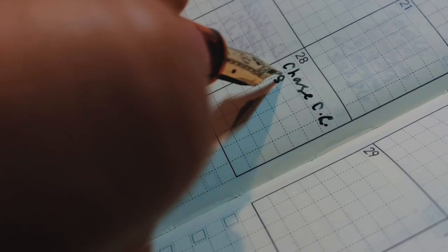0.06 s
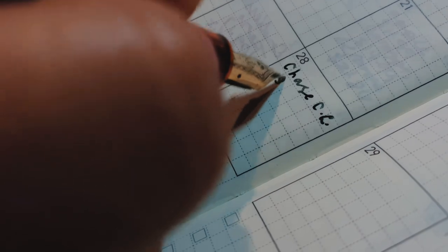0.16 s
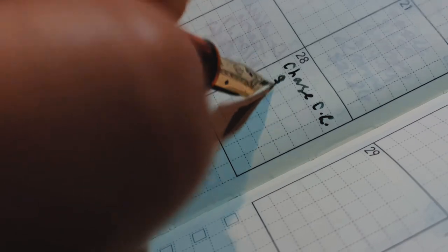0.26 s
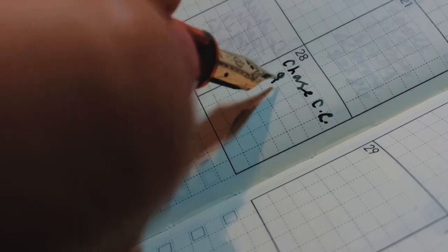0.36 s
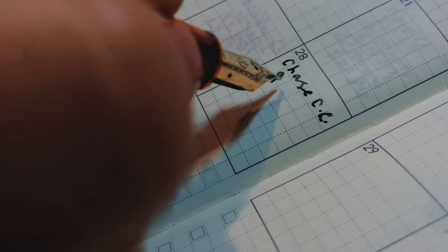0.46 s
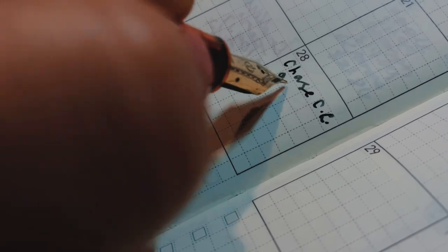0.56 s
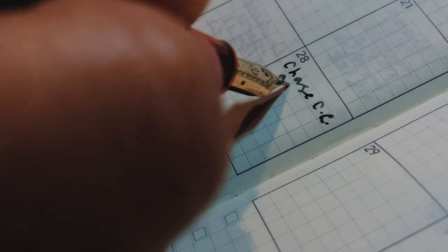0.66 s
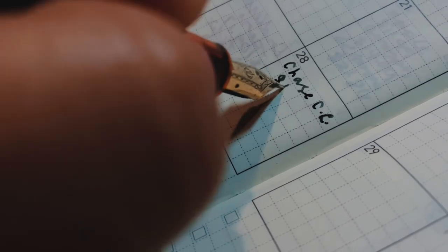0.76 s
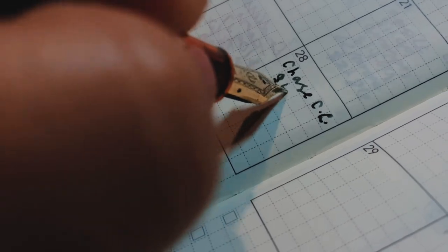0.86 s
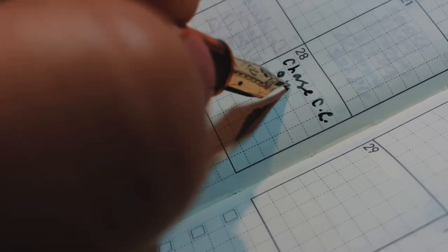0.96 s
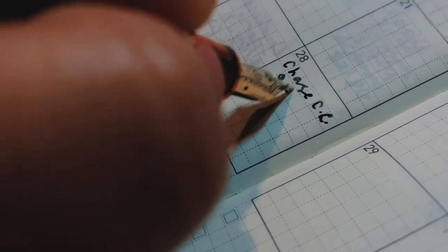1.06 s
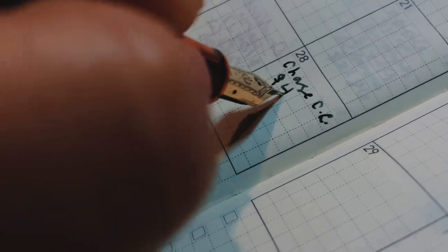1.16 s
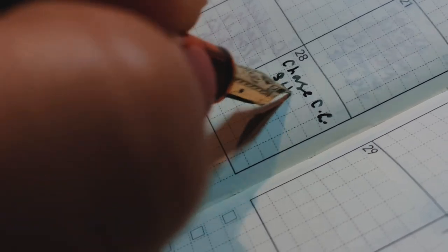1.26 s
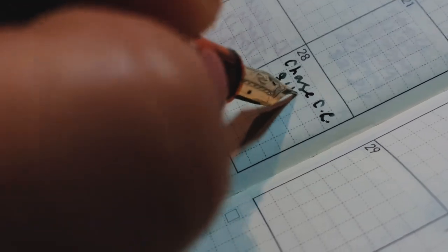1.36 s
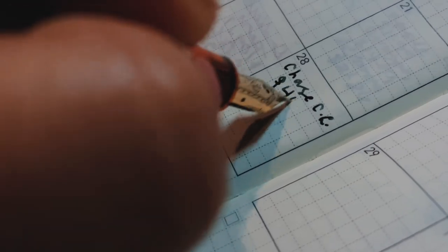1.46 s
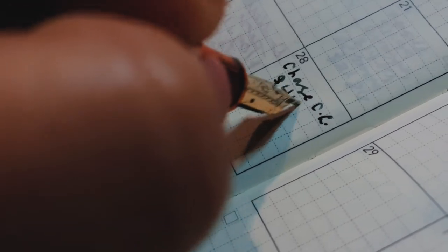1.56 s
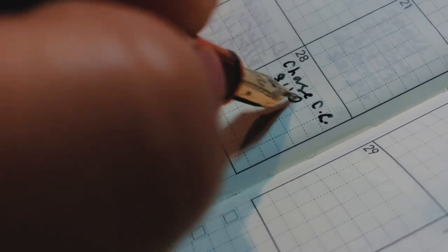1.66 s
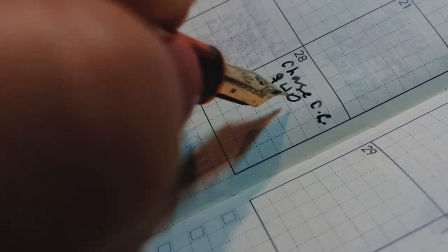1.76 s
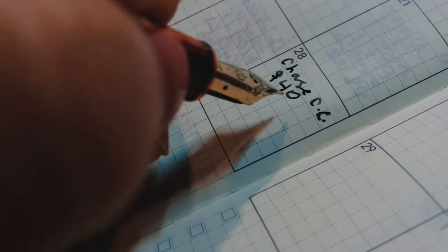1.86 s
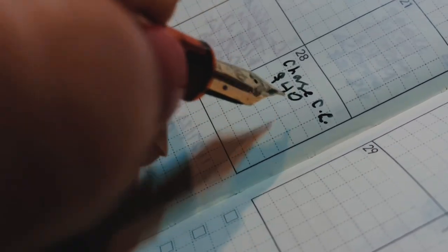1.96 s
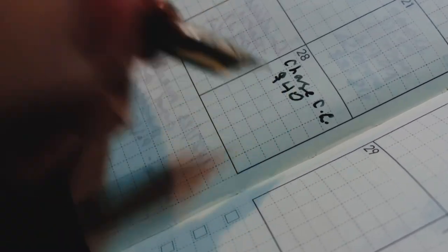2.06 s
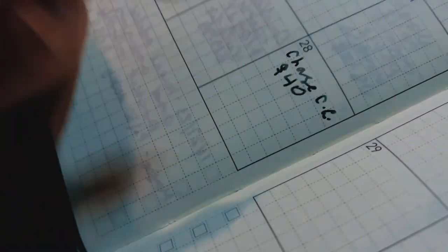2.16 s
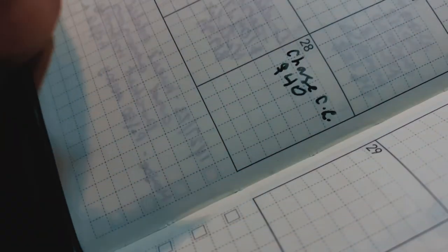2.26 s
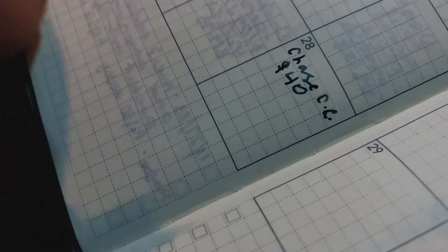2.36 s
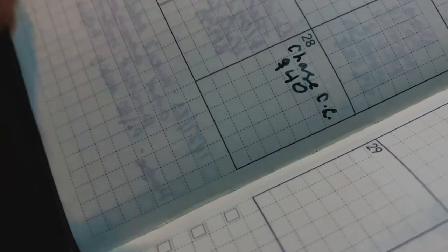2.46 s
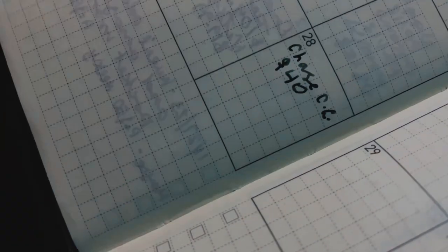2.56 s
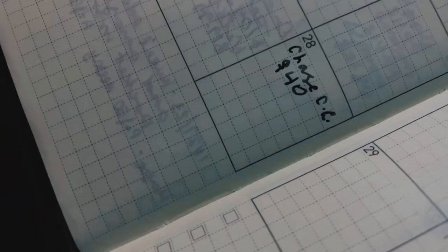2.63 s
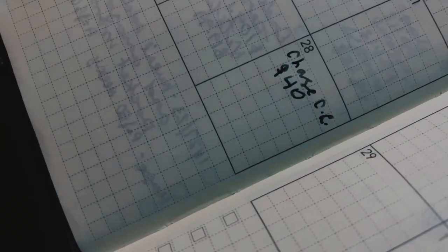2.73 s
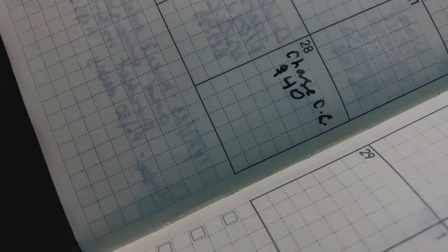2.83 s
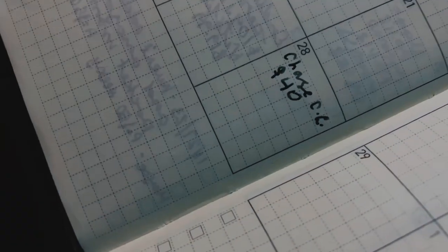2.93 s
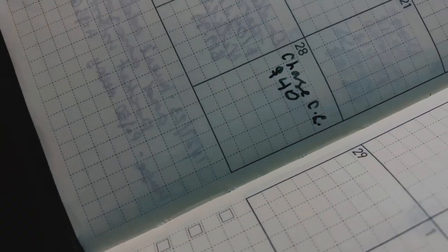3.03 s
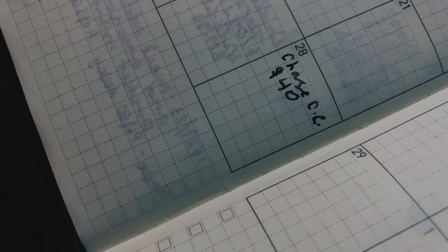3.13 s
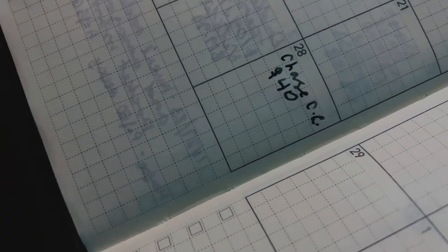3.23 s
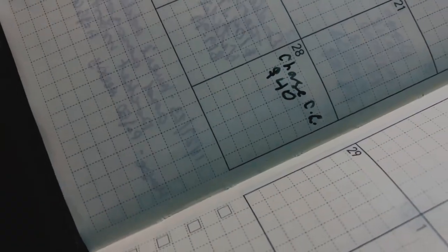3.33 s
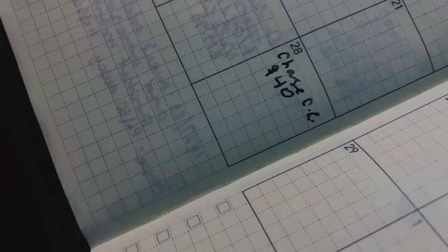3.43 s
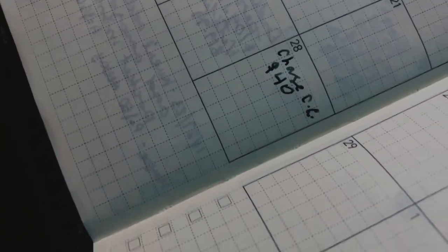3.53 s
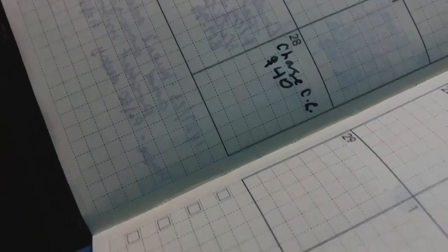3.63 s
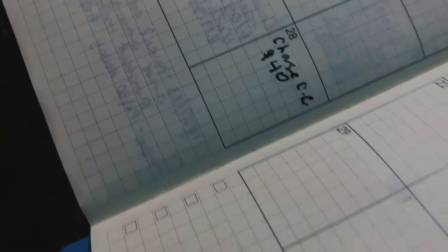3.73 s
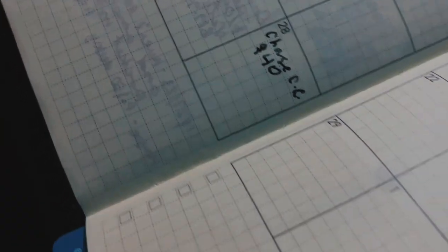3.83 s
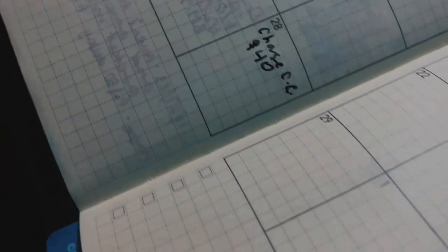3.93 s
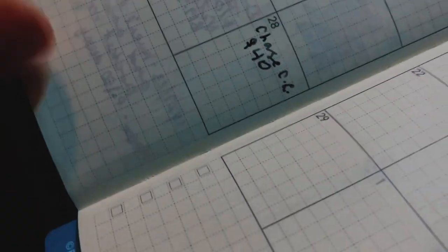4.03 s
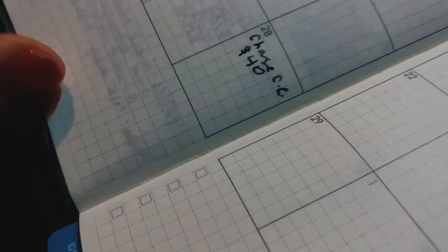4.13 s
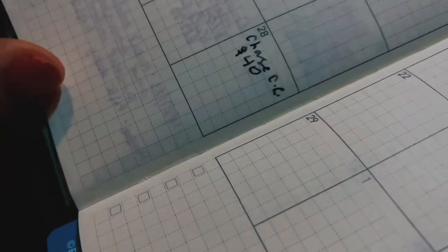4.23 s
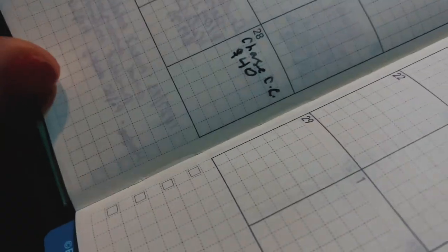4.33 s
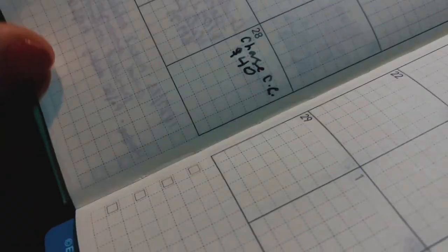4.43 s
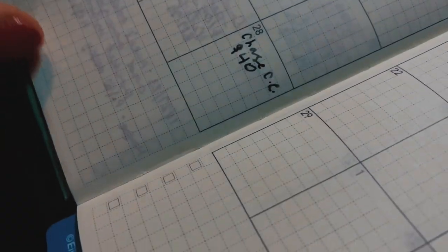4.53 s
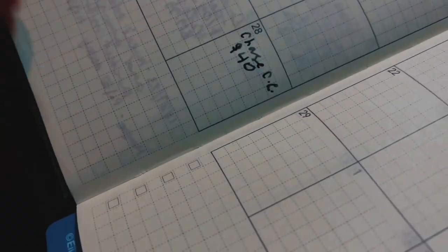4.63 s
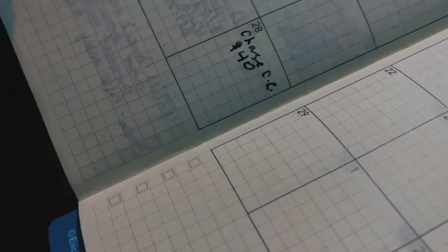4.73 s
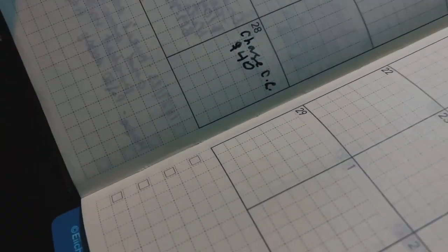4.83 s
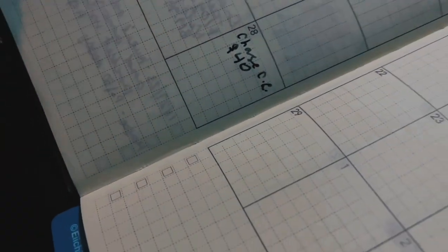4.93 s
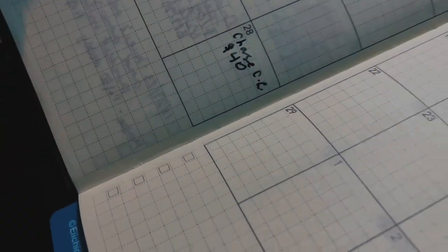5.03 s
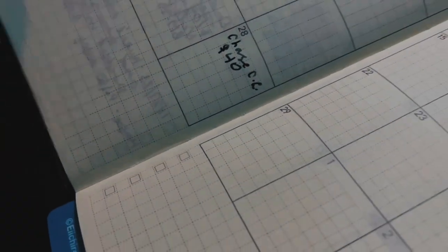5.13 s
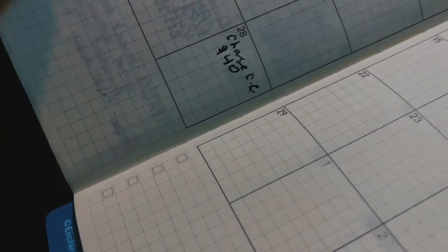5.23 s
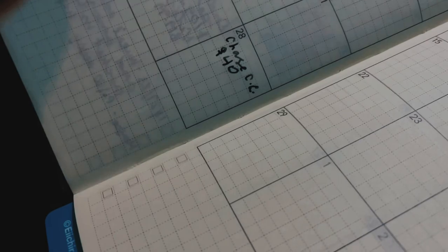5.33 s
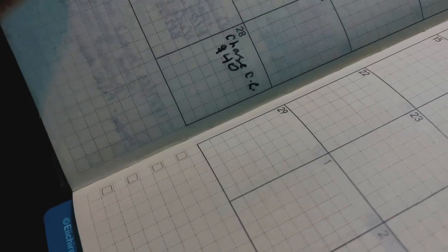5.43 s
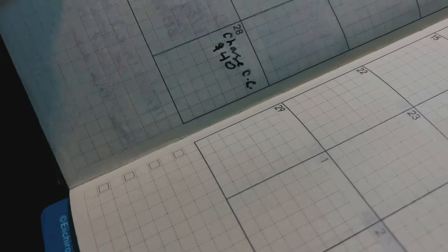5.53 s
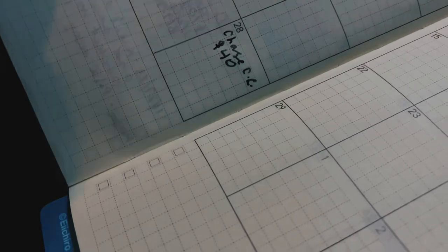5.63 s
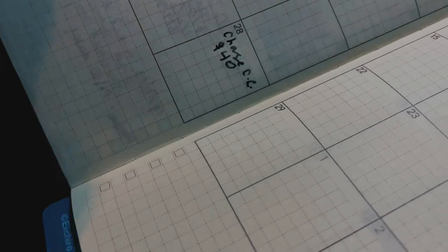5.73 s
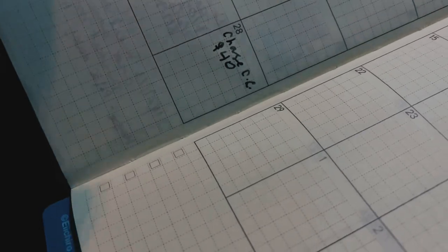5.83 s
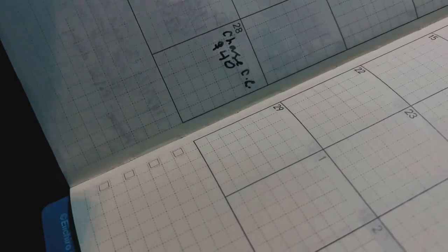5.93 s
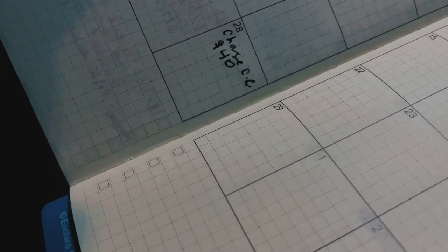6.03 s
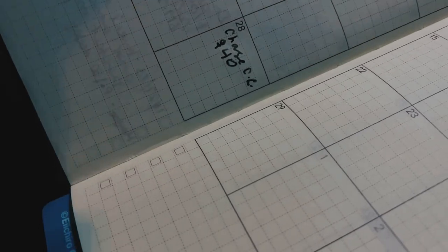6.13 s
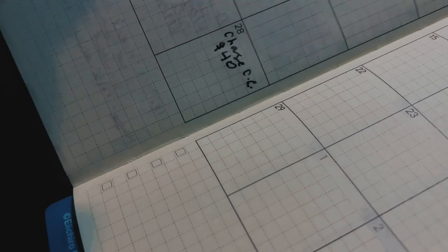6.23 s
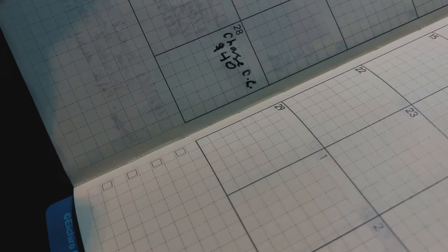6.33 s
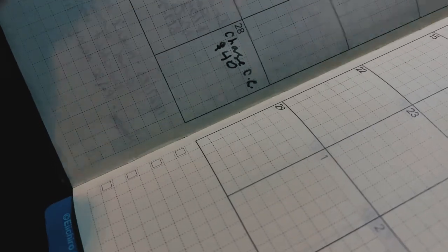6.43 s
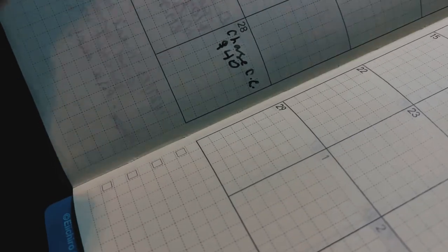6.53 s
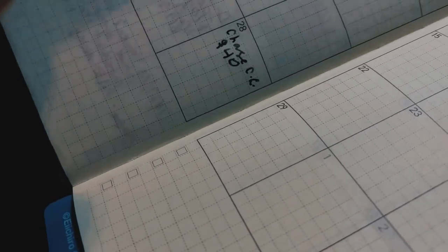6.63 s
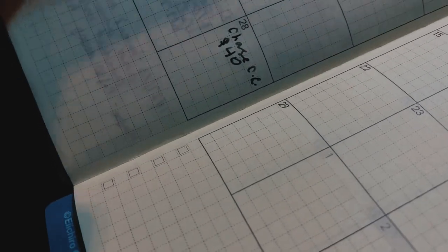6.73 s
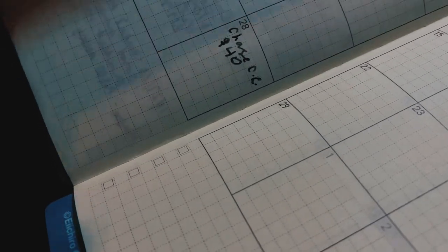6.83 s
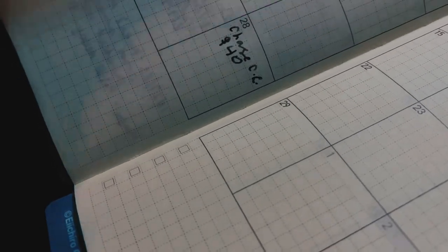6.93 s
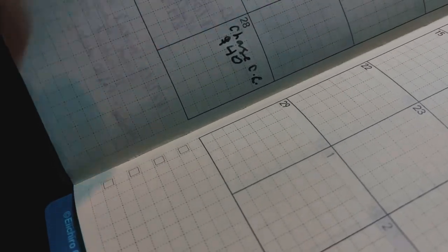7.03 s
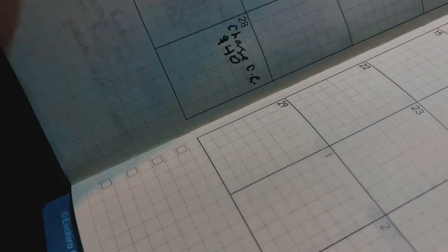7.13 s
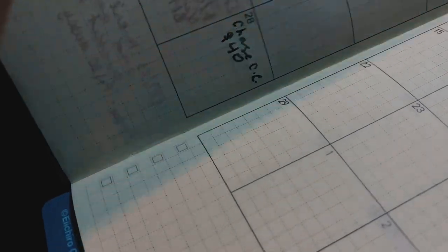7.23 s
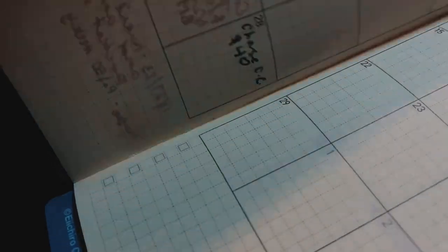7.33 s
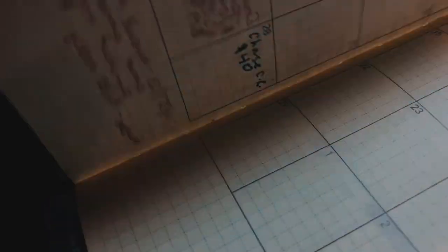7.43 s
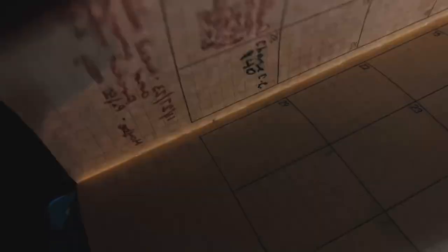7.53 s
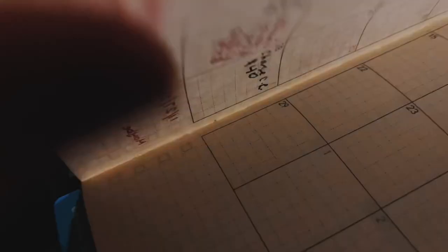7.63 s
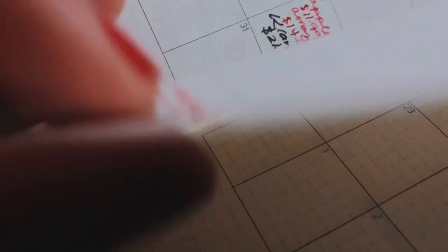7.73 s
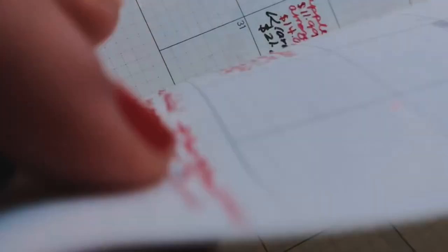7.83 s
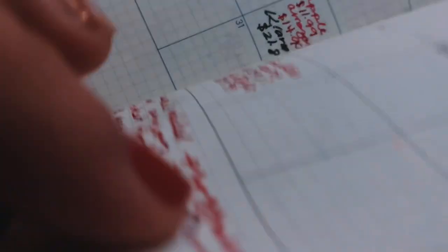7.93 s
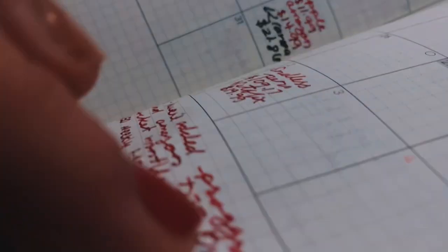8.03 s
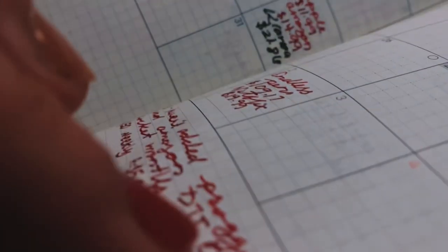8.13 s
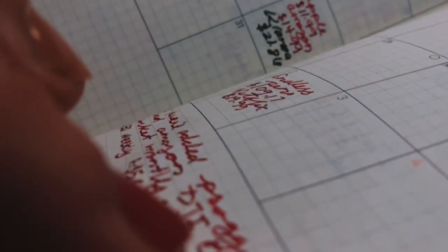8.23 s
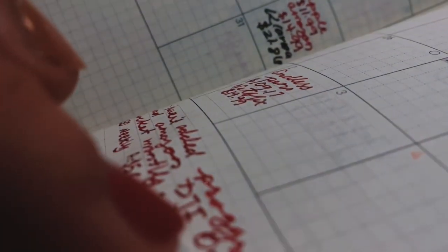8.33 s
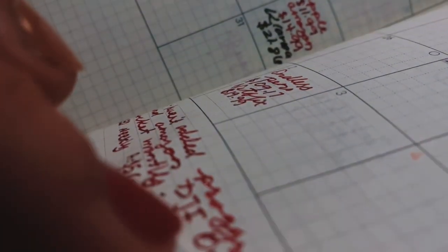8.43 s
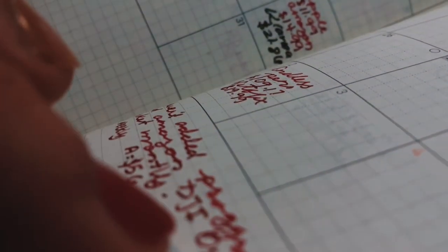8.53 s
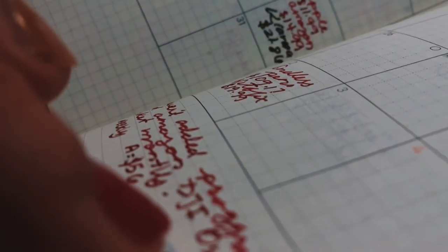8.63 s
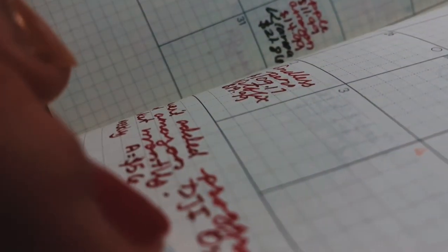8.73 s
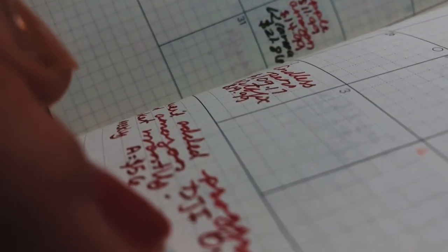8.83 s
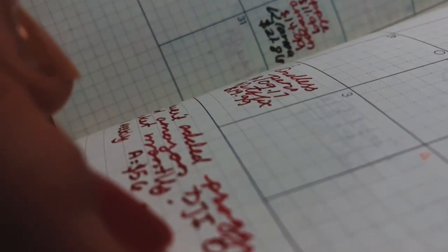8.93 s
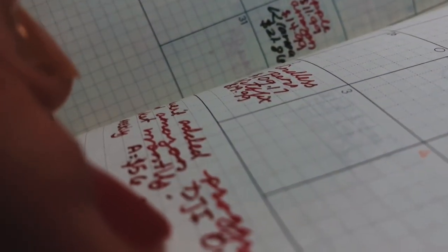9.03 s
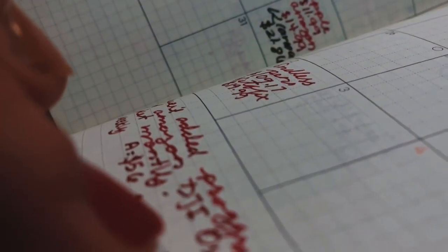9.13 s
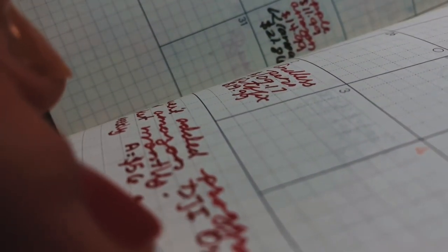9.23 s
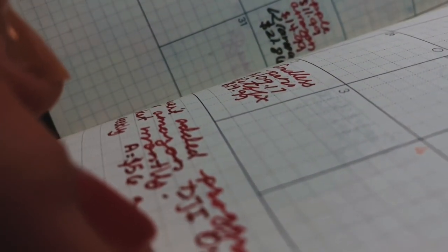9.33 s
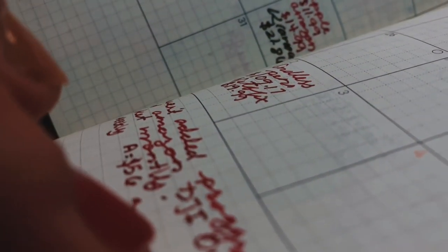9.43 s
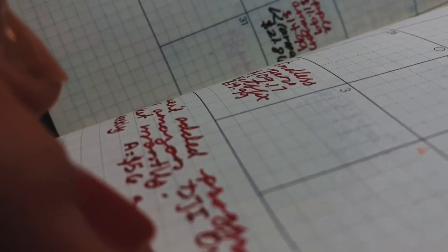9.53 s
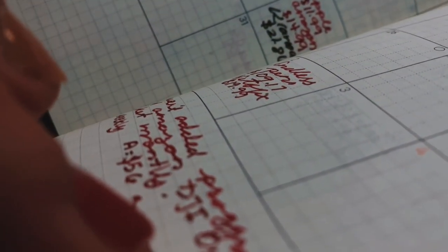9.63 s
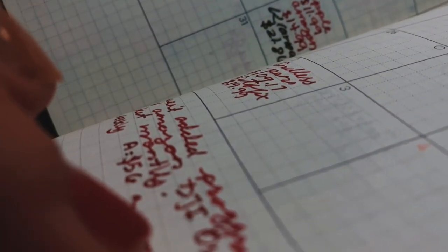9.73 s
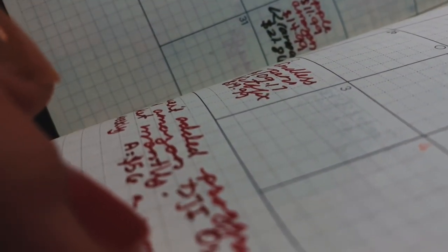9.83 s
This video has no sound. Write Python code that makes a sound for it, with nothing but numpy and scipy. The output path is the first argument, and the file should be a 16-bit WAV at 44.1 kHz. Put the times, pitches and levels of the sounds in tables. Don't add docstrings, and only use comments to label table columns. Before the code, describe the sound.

Faint nib scrapes come first, irregular and brief, over a soft drone of building hum and distant tyres. Skin brushes across paper, then isolated snaps and light finger rubbing. Page handling grows busier: hissing sheets, crisp flicks, pops and low soft thumps, until a page cracks flat with a hard bright slap. Only tiny dry paper creaks follow. Close microphone on a desk, with barely any room echo.

```python
import sys
import numpy as np
from scipy import signal
from scipy.fft import rfft, irfft, next_fast_len
from scipy.io import wavfile
from scipy.ndimage import uniform_filter1d, map_coordinates

SR = 44100
rng = np.random.default_rng(int(sys.argv[2]) if len(sys.argv) > 2 else 0)


def master_out(mix):
    frames = np.transpose(np.atleast_2d(mix))
    ceiling = np.clip(frames, -1, 1)
    pcm = np.round(ceiling * 32767).astype(np.int16)
    wavfile.write(sys.argv[1], SR, pcm)


def gain_from_db(level_db):
    decades = np.asarray(level_db, float) / 20
    return 10 ** decades


N = 436129

# start [t/s], end [t/s], start [level/dB], end [level/dB], hiss over body [dB]
PAGE_DRAGS = [(3.47, 3.6, -77.5, -74.5, 4.5), (4.016, 4.123, -61, -60.5, -5.5),
              (4.232, 4.249, -55.5, -61, -3.5), (6.54, 6.557, -40, -37, 6), (4.502, 4.59, -61, -56, 3.5),
              (4.584, 4.638, -58.5, -52.5, 5), (4.637, 4.777, -53, -61, 4), (5.005, 5.035, -64, -66, 2),
              (5.035, 5.124, -47.5, -48, 2), (5.802, 5.919, -74, -72, 0), (6.088, 6.198, -70, -63, -6),
              (6.35, 6.37, -63, -63, -10), (6.458, 6.47, -63, -63, -7), (5.124, 5.153, -48, -51, -10.5),
              (5.149, 5.285, -62.5, -57.5, -4), (5.273, 5.344, -57, -48.5, -0.5),
              (5.342, 5.375, -61, -59.5, -2.5), (5.919, 5.962, -42.5, -41.5, 3),
              (5.991, 6.089, -64, -71, -2), (6.476, 6.505, -55, -48.5, 0), (6.797, 6.848, -47.5, -39, 0),
              (6.849, 6.886, -38, -42, -2), (6.886, 6.933, -48, -46, -2), (6.935, 6.956, -52, -58, 10),
              (6.96, 6.999, -61.5, -55.5, 9), (7.001, 7.036, -58, -62, 12), (7.037, 7.072, -47, -57.5, 5),
              (7.16, 7.202, -49.5, -56, -3), (7.197, 7.274, -49, -55, -0.5),
              (7.272, 7.293, -49.5, -48, -1.5), (7.294, 7.323, -60, -59, -5), (7.32, 7.369, -52, -47, -7.5),
              (7.482, 7.56, -56.5, -56.5, -9), (7.561, 7.66, -56.5, -61, -3), (7.425, 7.473, -64, -62, 2),
              (7.752, 7.794, -55.5, -59.5, 1.5), (7.926, 7.987, -43.5, -46, -11),
              (8.065, 8.194, -57, -58.5, -14), (8.507, 8.594, -53, -62, -22)]
# start [t/s], peak [t/s], end [t/s], peak [level/dB], hiss over body [dB]
PAGE_FLICKS = [(4.78, 4.823, 4.87, -62, 3), (5.37, 5.42, 5.5, -48.5, 0.5), (5.5, 5.521, 5.531, -40, -3),
               (5.538, 5.548, 5.564, -34.5, -2.5), (5.564, 5.636, 5.662, -36, -4),
               (5.675, 5.713, 5.77, -49, -6), (5.958, 5.962, 5.99, -43, -4),
               (6.198, 6.238, 6.275, -42, -11), (6.28, 6.288, 6.35, -56, -13),
               (6.37, 6.414, 6.455, -52, -12), (6.505, 6.535, 6.5385, -39, 2),
               (6.546, 6.556, 6.575, -40, -16), (7.365, 7.402, 7.43, -46, 0), (7.43, 7.472, 7.478, -55, -4),
               (7.655, 7.69, 7.725, -50, -9), (7.745, 7.761, 7.78, -58, -3), (7.985, 7.992, 8.035, -45, -9),
               (8.31, 8.346, 8.362, -58, -8), (9.12, 9.151, 9.158, -55, -17)]


def rubs():
    outlines = []
    for start, end, start_db, end_db, hiss_db in PAGE_DRAGS:
        outlines.append([(start, start_db, hiss_db), (end, end_db, hiss_db)])
    for start, top, end, db, hiss_db in PAGE_FLICKS:
        outlines.append([(start, db - 11.5, hiss_db), (top, db, hiss_db), (end, db - 15.5, hiss_db - 4)])
    return outlines


# f/Hz, level/dB [dB per Hz]
SHEET_COLOUR = [(650, -39), (1100, -11), (1760, -8.5), (2300, -4.5), (3050, -3.5), (4560, -9.5), (4940, -7),
                (5710, -7.5), (6240, -8), (7140, -11), (8260, -9.5), (12400, -20.5), (15000, -15.5),
                (16000, -32)]
# t/s, peak [level/dB], hiss over body [dB]
SHEET_CRACKLES = [(5.153, -40, -10), (5.177, -51, -8), (5.2759, -51, -5.5), (5.357, -39, -12),
                  (5.598, -34, -18.5), (5.624, -33, -12), (5.775, -50.5, -10), (6.13, -38.5, -18),
                  (5.199, -52, -6), (5.461, -44, -10), (6.228, -40, -14), (6.408, -50, -14),
                  (6.284, -38.5, -28), (6.315, -38.5, -22.5), (7.201, -35.5, -14)]
# start [t/s], end [t/s], gain of the band [level/dB], centre [f/Hz], width [Hz]
CUPPED_AIR = [(4, 4.78, -10, 3750, 380), (4.6, 5.27, -10, 7000, 1370), (6.934, 6.958, 10, 5500, 1600),
              (6.96, 7.03, 9, 5100, 1380), (6.98, 7.035, 7, 7000, 2500), (7.04, 7.074, 0, 5800, 1500),
              (5.7, 6.885, -12, 2600, 950), (6.83, 6.87, -11, 5400, 1800), (6.9, 6.932, -3, 5200, 1240),
              (5.595, 5.612, -8.5, 3160, 900), (5.6, 5.65, -10, 4100, 1940), (7.17, 7.235, -5, 4700, 1500),
              (7.9, 6.8, -9, 3000, 900), (7.41, 7.478, -2, 5700, 1200), (7.19, 8.3, -13, 3200, 850),
              (7.66, 7.72, -1, 2100, 1200), (7.5, 8.2, -19.5, 14150, 2500),
              (6.475, 6.533, -3.5, 8400, 1800), (6.485, 6.533, -1, 4600, 1600),
              (5.92, 5.97, -5, 4200, 1500), (7.5, 8.5, -17, 11000, 3400), (7.93, 8, -9, 1960, 980),
              (7.93, 8.03, -6, 4430, 1500), (5.276, 5.345, -5, 6700, 1600), (5.4, 5.45, -6, 7400, 2500),
              (5.2, 5.25, -10, 9100, 1200), (5.04, 5.15, -15, 2270, 1100)]


def pages():
    rub = grit(grain_db=1.0, patchy_db=2.0)
    split_hz = 5000

    def high(hz):
        return 1 / (1 + (split_hz / (hz + 1)) ** 5)

    body = unit(filtered(rub, lambda hz: gain_from_db(along(SHEET_COLOUR, hz)) * np.sqrt(1 - high(hz))))
    hiss = unit(filtered(rub, lambda hz: gain_from_db(along(SHEET_COLOUR, hz)) * np.sqrt(high(hz))))
    outlines = rubs()
    gain = swell(outlines, edge_s=0.00304)
    gain = gain + gain_from_db(-26.0) * linger(gain, length_s=0.06)
    hiss_share = gain_from_db(curve(outlines, column=2, silent=-8.5) - 1.8)
    gains = gain_from_db(-2.0) * gain * np.array([np.ones(N), hiss_share])

    t = np.arange(SR // 16) / SR
    spurt = (1 - np.exp(-t / 0.00065)) * np.exp(-(t / 0.0098) ** 2)
    for s, db, hiss_db in SHEET_CRACKLES:
        levels = db - 13.5 + np.array([[0], [hiss_db + 8.5]])
        gains[:, round(s * SR):][:, :len(t)] += gain_from_db(levels) * spurt

    cups = np.zeros(N)
    for s, end, db, hz, width in CUPPED_AIR:
        cup_gain = swell([[(s, db), (end, db)]], edge_s=0.009)
        cups += cup_gain * unit(band(rub, hz - width / 2, hz + width / 2))
    return gains[0] * (body + cups) + gains[1] * hiss


# t/s, peak [level/dB], hiss relative [dB], knock relative [dB], note [f/Hz]
PAPER_SNAPS = [(2.0348, -33.5, -30, -5.5, 5100), (2.0406, -38.5, -30, -5, 3820),
               (2.041, -35, -30, -12, 5200), (3.98, -45, -4, -9.5, 6500), (4, -43, -1.5, -2, 8000),
               (4.016, -40, -9.5, -1.5, 3700), (4.2267, -26, -2, -10, 5210), (5.0374, -36.5, -5, -13, 3340),
               (5.6, -23, -16, -18, 3200), (5.627, -22, -11, -10, 3580), (5.9204, -27, -19, -12, 4170),
               (6.5352, -23.5, -16, -6, 5870), (6.5364, -18, -19.5, -7, 4400), (6.5423, -22, -16, -6, 6400),
               (6.5437, -13, -13.5, -20, 5360), (6.545, -17, -19.5, -10, 4570),
               (6.8012, -36.5, 0, 2.5, 4560), (6.92, -40, -9, -14.5, 5220), (6.9255, -40, -9, -12.5, 3000),
               (6.9395, -39.5, -9.5, -20.5, 7500), (6.9412, -29.5, -12, -22.5, 5440),
               (6.9515, -40, -13, -21.5, 5340), (6.9525, -40, -18.5, -17.5, 5200),
               (6.9753, -27, -6, -22, 5300), (6.9858, -45.5, 6, -20, 7000), (7.0358, -25.5, -4, -25, 6920),
               (7.0738, -24, -37.5, -6, 2920), (7.2978, -37.5, 3, -22.5, 7000),
               (7.3144, -15.5, -19, -10.5, 3300), (7.4788, -19.5, -25, -10.5, 4650),
               (7.5574, -46.5, -17, 2, 700), (7.659, -32.5, -32, -4, 2120),
               (8.459, -12.5, -23, -26.5, 11400), (8.4592, -17, -14, -20, 8000),
               (8.459, -22, -18.5, -20, 14500)]
# t/s, peak [level/dB], knock relative [dB], note [f/Hz]
NIB_TICKS = [(0.0953, -41, -6.5, 3580), (0.2784, -53.5, -20, 6500), (0.2997, -45.5, -12.5, 4000),
             (0.582, -46.5, -16.5, 3000), (0.973, -45.5, -14.5, 3500), (1.0002, -45.5, -5, 3500),
             (1.283, -50, -7.5, 3500), (1.3145, -53.5, 4, 3500), (1.374, -40, -0.5, 3600),
             (1.697, -41.5, -6, 3630), (2.0136, -46, -13, 3600), (2.0352, -38, -2, 3900),
             (2.0397, -39, -12, 3900), (2.1703, -36, 0, 4200), (2.404, -50, -8, 3600),
             (2.5387, -51, -4, 3600), (3.548, -49.5, -10.5, 6000), (4.2569, -38, -8, 3800),
             (5.756, -55.5, -5, 3600)]
# t/s, peak [level/dB], first pitch [f/Hz]
SHEET_POPS = [
    (2.1707, -44, 1500),
    (6.8871, -17.5, 1800),
    (7.0742, -29, 1310),
    (7.4814, -30, 1720),
    (7.5578, -29, 900),
    (8.4591, -7.5, 1870),
]


def snaps():
    t, parts = np.arange(SR // 12) / SR, np.zeros((4, N + SR))
    spread = np.array([[1.1], [0.6], [1.9]])
    fade = gain_from_db(-60 * t / (0.0038 * spread)) + gain_from_db(-13 - 60 * t / (0.028 * spread))
    events = [(s, db, -9, knock_db, hz, -7.5) for s, db, knock_db, hz in NIB_TICKS]
    events += [(s, db, hiss_db, knock_db, hz, -1.5) for s, db, hiss_db, knock_db, hz in PAPER_SNAPS]
    for s, db, hiss_db, knock_db, hz, note_db in events:
        start = round(s * SR)
        burst = 1.03 * rng.standard_normal(len(t)) * fade * (1 - np.exp(-t / 0.000238))
        burst[:, 6] += 4.5
        levels = db + np.array([[0], [hiss_db], [knock_db]])
        parts[:3, start:][:, :len(t)] += gain_from_db(levels) * burst
        parts[3, start:][:len(t)] += gain_from_db(db + note_db) * falling(hz, sag=13.96, cycles=20.6)
    for s, db, hz in SHEET_POPS:
        parts[3, round(s * SR):][:len(t)] += gain_from_db(db - 3.5) * falling(hz, sag=1.3, cycles=28)

    out = parts[3, :N].copy()
    bands = [(1630, 4460, 0.37), (6100, 22000, 5.7), (446, 2020, 9.7)]  # (low Hz, high Hz, dB)
    for (low, top, db), part in zip(bands, parts):
        out += gain_from_db(db) * band(part[:N], low, top)
    return out


# t/s, level/dB
PAGE_SLAP = (8.459, -4)
# f/Hz, level/dB, t60 [s]
COVER_RING = [(619, -19, 0.066), (780, -11, 0.04), (933, -10, 0.0298), (1292, -2.5, 0.0263),
              (1615, 2, 0.018), (1821, -4, 0.051), (2066, 0.5, 0.028), (2420, -1.5, 0.031),
              (2832, -5, 0.035), (3300, -6, 0.037), (3650, -3.5, 0.024), (4150, -5.5, 0.0265),
              (5210, -4, 0.025), (6000, -13, 0.026), (7370, -8, 0.024)]


def slap():
    t, out = np.arange(SR // 8) / SR, np.zeros(N)
    ring = np.zeros(len(t))
    for k, (hz, db, t60) in enumerate(COVER_RING):
        blur = uniform_filter1d(rng.standard_normal(len(t)), 30) * 5
        mode = (0.56 + 0.648 * blur) * np.sin(2 * np.pi * hz * t)
        ring += (-1) ** k * gain_from_db(db - 60 * t / (0.74 * t60)) * mode
    crack = rng.standard_normal(len(t)) * (gain_from_db(-5.5 - 60 * t / 0.008) + gain_from_db(-26 - 60 * t / 0.025))
    crack += uniform_filter1d(rng.standard_normal(len(t)), 22) * gain_from_db(-3.5 - 60 * t / 0.052)
    s, db = PAGE_SLAP
    out[round(s * SR):][:len(t)] = gain_from_db(db) * (gain_from_db(-7) * ring * (1 - np.exp(-t / 0.00062)) + crack)
    return out


# t/s, peak [level/dB]
PAGE_CREAKS = [(7.818, -38), (7.854, -35), (7.909, -33), (8.066, -33.5), (8.268, -41.5), (8.302, -38),
               (8.3333, -45.5), (8.4305, -32.5), (8.487, -48.5), (8.618, -48), (8.645, -45), (8.688, -45.5),
               (8.7829, -49), (8.816, -39.5), (8.843, -44.5), (9.021, -44), (9.117, -42.5), (9.212, -52),
               (9.2503, -38.5), (9.28, -42), (9.56, -44), (9.6028, -44.5), (9.663, -41.5), (9.707, -42.5),
               (9.736, -44), (9.787, -39)]
# f/Hz, level/dB [dB per Hz]
HELD_PAGE = [(820, -32), (1400, -5.5), (2890, 1), (4170, -8.5), (4900, -7.5), (6390, -14), (10300, -18.5),
             (11800, -21), (14700, -20), (16000, -17)]


def creaks():
    t, gain = np.arange(SR // 16) / SR, np.zeros(N)
    spurt = (1 - np.exp(-t / 0.00083)) * (np.exp(-(t / 0.0085) ** 2) + 0.15 * np.exp(-t / 0.0185))
    for s, db in PAGE_CREAKS:
        gain[round(s * SR):][:len(t)] += gain_from_db(db - 10.5) * spurt
    return gain * coloured(rng.standard_normal(N) * gain_from_db(1.8 * wobble(500)), HELD_PAGE)


# t/s, level/dB, pitch [f/Hz]
DESK_THUDS = [(2.133, -37, 70.4), (2.175, -34, 80), (4.02, -32, 83.5), (5.023, -32.5, 169),
              (5.03, -40, 105), (5.035, -33, 74.5), (5.525, -32, 95.5), (5.559, -33, 121),
              (6.547, -20.5, 203), (6.556, -19, 116.4), (6.572, -25, 139.6), (6.584, -33, 120),
              (7.317, -33, 280), (7.486, -28, 280), (7.505, -33.5, 240), (6.548, -25, 361),
              (6.564, -23.5, 299), (6.553, -23, 814), (7.482, -26.5, 193), (7.492, -30, 80),
              (7.558, -32.5, 221), (7.575, -27.5, 145), (7.73, -27, 330), (8.463, -24, 284),
              (8.463, -17.5, 167), (8.47, -29, 121.5)]


def thuds():
    t, out = np.arange(SR // 4) / SR, np.zeros(N + SR)
    for s, db, hz in DESK_THUDS:
        t60 = 0.1 * (100 / hz) ** 0.68
        puff = uniform_filter1d(uniform_filter1d(rng.standard_normal(len(t)), size=30), size=24) * 1.97
        swing = np.sin(2 * np.pi * hz * t * (1 - 3 * t)) + puff
        out[round(s * SR):][:len(t)] += gain_from_db(db - 60 * t / t60) * (1 - np.exp(-t / 0.0028)) * swing
    return out[:N]


# start [t/s], peak [t/s], end [t/s], peak [level/dB]
PEN_PULLS = [
    (0.113, 0.135, 0.13, -64),
    (0.138, 0.18, 0.2424, -44.5),
    (0.675, 0.711, 0.72, -46),
    (1.035, 1.07, 1.107, -41.5),
    (1.367, 1.385, 1.435, -44.5),
    (1.505, 1.55, 1.58, -47),
]
# start [t/s], peak [t/s], end [t/s], peak [level/dB]
PEN_SWEEPS = [
    (0.755, 0.807, 0.84, -53),
    (1.43, 1.48, 1.512, -49.5),
    (1.6, 1.632, 1.645, -48.5),
]
# f/Hz, level/dB [dB per Hz]
PULLED_NIB = [(410, -27), (700, -6), (1500, -1.5), (1700, 1), (2400, -18), (2920, -0.5), (3640, -6),
              (4150, -1), (5920, -17.5), (6830, -12), (9110, -24.5), (10100, -16), (12600, -38),
              (15200, -20.5), (16000, -28)]
# f/Hz, level/dB [dB per Hz]
SWEPT_NIB = [(530, -28.5), (900, -0.5), (1260, -8), (1550, 2), (1970, 1), (2560, -16), (3150, -4.5),
             (3430, -5), (7230, -13), (8350, -8.5), (9310, -17.5), (10200, -14), (12400, -25.5),
             (14200, -13), (16000, -26.5)]


def pen():
    pull_grit = coloured(grit(grain_db=0.6, patchy_db=1.5), PULLED_NIB)
    sweep_grit = coloured(grit(grain_db=1.5, patchy_db=3.5), SWEPT_NIB)
    pull = swell(strokes(PEN_PULLS), edge_s=0.02) * pull_grit
    sweep = swell(strokes(PEN_SWEEPS), edge_s=0.049) * sweep_grit
    return gain_from_db(1.5) * (pull + sweep)


def strokes(rows):
    return [[(s, db - 5), (top, db), (end, db - 5.5)] for s, top, end, db in rows]


# t/s, level/dB
HAND_GLIDE = [(2.03, -65), (2.038, -60), (2.052, -63), (2.096, -56), (2.41, -61), (2.52, -77)]
# t/s, level/dB
FINGER_GLIDE = [(4.275, -58.5), (4.291, -51.5), (4.505, -51.5), (4.55, -60.5)]
# f/Hz, level/dB [dB per Hz]
HAND_GAP = [(940, -13.5), (1600, -3.5), (1920, -3), (2310, -7), (3880, -5.5), (4750, -11), (5500, -3),
            (6250, -15), (6850, -7), (7600, -16.5), (8980, -9.5), (11300, -27), (13200, -29),
            (15100, -17.5), (16000, -24.5)]
# f/Hz, level/dB [dB per Hz]
FINGER_GAP = [(880, -30), (1500, -5), (2000, -2), (2370, -10), (2660, 3), (3050, -15), (3350, -6),
              (3600, -8.5), (3880, -8), (4920, -14.5), (6560, -6.5), (8240, -20), (9750, -17), (10800, -33),
              (14300, -21), (16000, -24)]


def skin():
    glide = grit(grain_db=0.5, patchy_db=0.9)
    hand = gain_from_db(0.5) * swell([HAND_GLIDE], edge_s=0.01) * coloured(glide, HAND_GAP)
    finger = gain_from_db(-1.5) * swell([FINGER_GLIDE], edge_s=0.037) * coloured(glide, FINGER_GAP)
    return hand + finger


# f/Hz, t60 [s]
WALL_DECAY = [(300, 0.27), (3000, 0.16), (12000, 0.081)]


def walls(x):
    hz, t, z = signal.stft(rng.standard_normal(SR // 3), SR, nperseg=256)
    tail = signal.istft(z * gain_from_db(-60 * t / along(WALL_DECAY, hz)[:, None]), SR, nperseg=256)[1]
    return signal.fftconvolve(np.pad(x, (200, 0)), tail / np.linalg.norm(tail))[:N]


# t/s, level/dB
BUILDING = [(0, -1.5), (1.8, 0), (3.5, 0), (5.2, 1), (6.5, 0), (7.5, 2), (9.89, -.5)]
# f/Hz, level/dB [dB per Hz]
RUMBLE_COLOUR = [(13, -51), (25, -15), (40, -4.5), (70, 0), (97, -9.5), (136, -10), (162, -12.5),
                 (195, -12.5), (260, -18), (340, -44), (570, -120)]
# f/Hz, level/dB [dB per Hz]
AIR_COLOUR = [(110, -32), (180, 0.5), (293, -5), (361, -4), (510, -2.5), (630, -12), (800, -9), (1100, -12),
              (1530, -23), (1680, -23), (2110, -26), (3370, -32), (3840, -33.5), (8140, -40.5),
              (12800, -48.5), (15000, -47), (16000, -43.5)]
# t/s, level/dB
TYRE_ROAR = [(0, 1), (3.6, 1.5), (5.5, -2.5), (9.89, -7.5)]
# t/s, level/dB
DUCT_DRONE = [(0, -7.5), (1.9, -6), (2.9, -9), (3.6, -14), (7, -18.5), (9.89, -12)]
# t/s, level/dB
LAMP_WHINE = [(0, -83), (2, -93), (3, -87.5), (9.89, -100)]


def room():
    rumble = unit(filtered(rng.standard_normal(N), lambda hz: gain_from_db(along(RUMBLE_COLOUR, hz)) * (hz < 200)))
    hum_grit = grit(grain_db=0.3, patchy_db=0.5)
    air = unit(filtered(hum_grit, lambda hz: gain_from_db(along(AIR_COLOUR, hz)) * (hz >= 200)))
    tyres_hz, tyres_octaves = 1420, 0.42
    tyres = filtered(air, lambda hz: np.exp(-(np.log2((hz + 1) / tyres_hz) / tyres_octaves) ** 2))
    air = air + (gain_from_db(curve([TYRE_ROAR])) - 1) * tyres
    duct = unit(filtered(rng.standard_normal(N), resonant([(291.7, 17.4, 0)], widen=0.765)))
    whine = unit(filtered(rng.standard_normal(N), resonant([(7950, 45, 0)], widen=0.89)))

    busy = curve([BUILDING])
    low = gain_from_db(-49.5 + 0.73 * busy + 1.46 * wobble(3.7)) * rumble
    drone = gain_from_db(curve([DUCT_DRONE]) + 1.2 * wobble(1.0)) * duct
    hum = gain_from_db(-50.5 + busy + 0.55 * wobble(2.887)) * (air + drone)
    return low + hum + gain_from_db(curve([LAMP_WHINE])) * whine


def grit(grain_db, patchy_db):
    clumps = gain_from_db(grain_db * (wobble(900) + 0.59 * wobble(120)))
    z = signal.stft(rng.standard_normal(N) * clumps, nperseg=256)[2]
    patches = uniform_filter1d(uniform_filter1d(rng.standard_normal(z.shape), 7, 0), 8, 1)
    return signal.istft(z * gain_from_db(patchy_db * unit(patches)), nperseg=256)[1][:N]


def falling(hz, sag, cycles):
    turns = np.arange(SR // 12) / SR * hz
    swing = np.sin(2 * np.pi * sag * np.log(1 + turns / sag))
    return gain_from_db(-60 * turns / cycles) * (1 - np.exp(-turns / 0.11)) * swing


def resonant(peaks, widen):
    def response(f):
        total = 0
        for k, (centre, width, db) in enumerate(peaks):
            damping = 1j * f * width * widen
            total = total + (-1) ** k * gain_from_db(db) * damping / (centre * centre - f * f + damping)
        return total
    return response


def filtered(x, response):
    m = next_fast_len(N + SR // 2)
    return irfft(rfft(x, m) * response(np.fft.rfftfreq(m, 1 / SR)), m)[..., :N]


def coloured(x, spectrum):
    return unit(filtered(x, lambda hz: gain_from_db(along(spectrum, hz))))


def band(x, low_hz, high_hz):
    return signal.sosfilt(signal.butter(2, [low_hz, high_hz], "band", fs=SR, output="sos"), x)


def unit(x):
    return x / np.sqrt(np.mean(x ** 2) + 1e-20)


def along(points, hz):
    f, v = np.transpose(points)
    return np.interp(np.log(hz + 1), np.log(f + 1), v)


def curve(tables, column=1, silent=-140):
    out = np.full(N, float(silent))
    for rows in tables:
        rows = np.array(rows)
        at = np.arange(int(rows[0, 0] * SR), min(int(rows[-1, 0] * SR) + 1, N))
        out[at] = np.interp(at / SR, rows[:, 0], rows[:, column])
    return out


def swell(tables, edge_s):
    return uniform_filter1d(gain_from_db(curve(tables)), int(edge_s * SR) + 1)


def linger(gain, length_s):
    size = int(length_s * SR) // 2 * 2 + 1
    return uniform_filter1d(gain, size, origin=size // 2)


def wobble(rate):
    knots = rng.standard_normal(int(N * rate / SR) + 4)
    return map_coordinates(knots, [np.arange(N) * rate / SR], order=2)


# f/Hz, width [Hz], depth [0-1]
MIC_PORT = (13300, 16100, 0.81)


def scene():
    hz, width, depth = MIC_PORT
    notch = resonant([(hz, width, 0)], widen=1)
    sharp = filtered(snaps() + slap(), lambda f: 1 - depth * notch(f))
    desk = pages() + sharp + creaks() + thuds() + pen() + skin()
    return (desk + gain_from_db(-31.0) * walls(desk) + room())[None]


def band_limit(x):
    return signal.sosfilt(signal.butter(12, 16870, fs=SR, output="sos"), x)


def record(dry):
    def microphone(hz):
        treble = gain_from_db(-25 * np.clip((hz - 15980) / 120, 0, 1))
        bass = np.clip(hz / 32, 0, 1) ** 3
        return treble * bass

    return band_limit(filtered(dry, microphone))


dry = scene()
out = record(dry)
master_out(out)
```